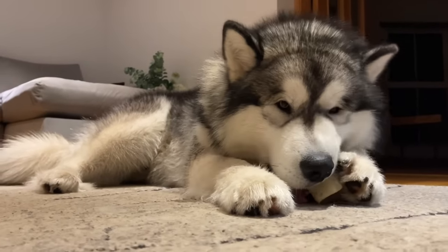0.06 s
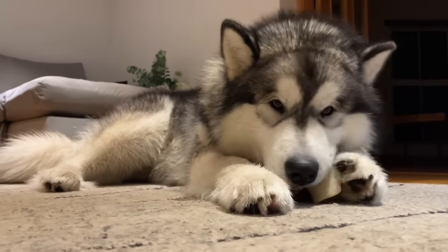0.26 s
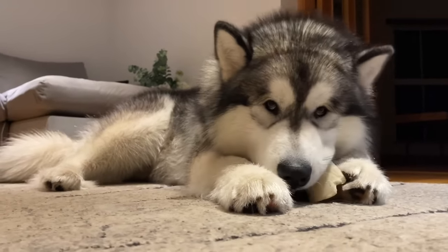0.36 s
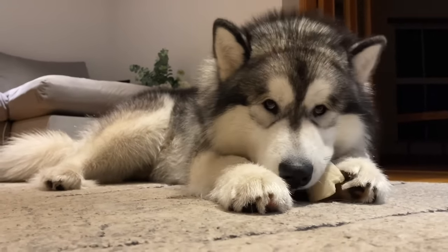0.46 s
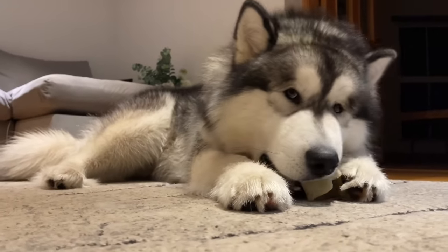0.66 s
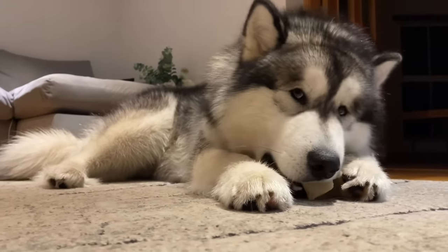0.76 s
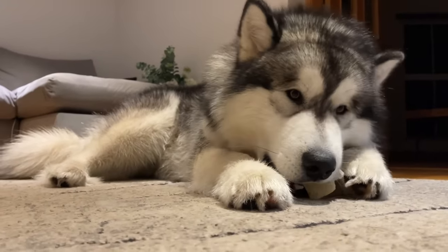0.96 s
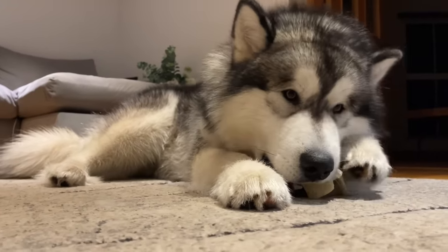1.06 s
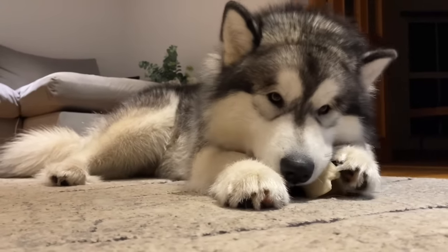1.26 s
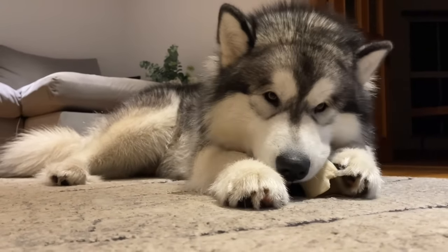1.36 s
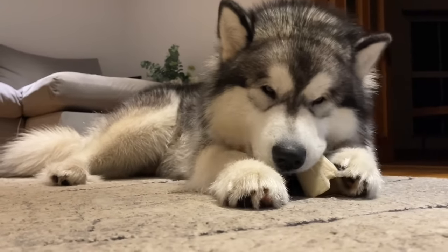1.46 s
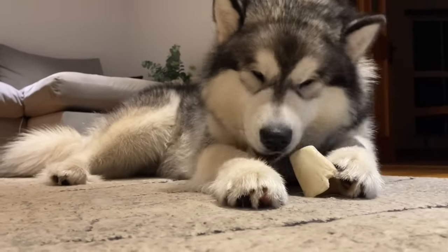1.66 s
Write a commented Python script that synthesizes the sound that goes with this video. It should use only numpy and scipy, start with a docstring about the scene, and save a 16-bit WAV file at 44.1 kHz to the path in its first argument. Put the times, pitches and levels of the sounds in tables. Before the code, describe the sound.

Close stereo pickup of dog teeth catching on a hard chew bone in a quiet living room; a sudden loud crack, a pause with small knocks, a second rougher crunching cluster, then faint ticks and quiet air.

```python
"""A soft hiss over a low murmur of air comes first; then a big dog gnaws a hard bone, close by, on a rug indoors.
Teeth catch in quick clusters: each catch is a short damped knock, noise bursts for splinters and crack, a low thud.
Gritty scrapes are rough filtered noise; small wet ticks between the bites are narrow noise bursts.
Echoes, a fading noise tail and slowly dying tones make the quiet living room ring on.
The murmur is steady filtered noise; the hiss is grainier, strongest just after the first loud bite, with a deep dip midway."""
import sys
import numpy as np
from scipy import signal
from scipy.fft import rfft, irfft
from scipy.io import wavfile
from scipy.ndimage import uniform_filter1d

SR = 44100
rng = np.random.default_rng(int(sys.argv[2]) if len(sys.argv) > 2 else 0)


def pcm_store(signal):
    """Save signal as 16-bit PCM."""
    levels = np.round(np.clip(np.atleast_2d(signal), -1, 1) * 32767)
    wavfile.write(sys.argv[1], SR, levels.astype(np.int16).T)


N = 74970  # length in samples, 1.7 s

# steady air in the room: [f/Hz, relative level/dB]
AIR_COLOUR = [(25, -7), (60, -22), (120, 0), (250, 0), (450, -3), (800, -4.5), (1200, -10.5), (2000, -48),
              (4000, -103), (12000, -53)]
AIR_DB = -66.5

# tone of the soft hiss: [f/Hz, relative level/dB]
HISS_COLOUR = [(300, 6), (1500, 10), (2300, 3), (3300, -1), (4600, 1.5), (6500, -4.5), (8400, 6),
               (9500, 1.5), (11300, 3), (12000, -35)]
# loudness of the hiss over time: [t/s, level/dB]
HISS_LEVEL = [(0, -61.5), (.11, -68.5), (.18, -64), (0.258, -55.5), (.39, -63.5), (.47, -60.5),
              (0.577, -66.5), (.72, -78), (0.818, -79.5), (.89, -62), (.98, -62.5), (1.089, -60.5),
              (1.16, -60.5), (1.31, -63.5), (1.382, -65), (1.429, -65.5), (1.499, -67), (1.7, -61.5)]
HISS_FLICKER_DB, HISS_GRAIN = 0.97, 0.31  # slow level changes; depth of the fast roughness

# tone of the room's fading tail: [f/Hz, relative level/dB]
ROOM_COLOUR = [(40, -8), (100, -14), (250, -8), (420, -9.5), (570, -20), (680, -9.5), (780, -25),
               (930, -15.5), (1200, -23.5), (1600, -21), (3000, -8.5), (8000, -8.5), (13000, -43)]
# time the tail takes to fall by 60 dB: [f/Hz, fall time/s]
ROOM_T60 = [(60, 0.85), (400, 0.88), (1000, 1), (3000, 0.37), (10000, 0.24)]
# standing waves of the room: [f/Hz, relative level/dB, time to fall by 60 dB/s]
ROOM_MODES = [(66, -27, 0.11), (173.3, -39, 0.42), (183, -42, 1.3), (269.6, -36, 0.24), (372, -42, 1.6),
              (420, -40.5, 0.96), (517, -44.5, 1), (657, -47, 1.1), (686, -46.5, 1.8), (908, -41, 0.96),
              (989, -42.5, 0.4)]
# share of the gnawing that carries into the room: [t/s, level/dB]
ROOM_SEND = [(.24, -2.5), (.68, -0.5), (.91, 0), (1.13, 1)]
EARLY_DB, EARLY_S, FIRST_ECHO_S = -13, 0.01, 0.004036
# delay counted from the first echo, spread, and strength of the far wall's answer
WALL_ECHO_S, WALL_ECHO_SPREAD_S, WALL_ECHO_DB = 0.1047, 0.0068, -1
MODE_WAVER, MODE_WAVER_HZ = 0.88, 21

# stereo noise: share of the part that is opposed between left and right
ROOM_WIDTH, AIR_WIDTH, HISS_WIDTH = 0.9, 0.46, 0.65
WIDE_ABOVE_HZ = 310

# soft bumps of bone and paws on the rug, and late low thuds just after some bites: [t/s, level/dB]
BUMPS = [(0.037, -84), (.688, -54), (.824, -70), (0.935, -58), (1.066, -71), (1.574, -59)]
FLOOR_LAG_S = 0.0022  # the floor answers after the jaw
THUD_HZ, THUD_S = 77.6, 0.0035  # floor: pitch, time to swell
JAW_HZ, JAW_S, JAW_DB = 255.3, 0.0023, 1  # jaw: pitch, time to swell, level against the floor

# small ticks of teeth and wet lips: [t/s, peak level/dB, centre f/Hz]
TICKS = [(0.0247, -51.5, 9300), (0.422, -44.5, 6440), (0.7092, -54, 9150), (0.788, -58, 8500),
         (.8992, -46.5, 8600), (1.058, -51, 8500), (1.2438, -50, 7900), (1.2703, -40.5, 8360),
         (1.3112, -45, 8000)]
TICK_S, TICK_WIDTH_OCT = 0.0012, 0.35  # fade time; octaves to each side of the centre

# teeth scraping over the bone, into and through a bite: [t of the height/s, half length/s, level/dB]
SCRAPES = [(0.2283, 0.0048, -40), (0.252, 0.012, -52), (0.898, 0.0032, -55.5), (1.101, 0.0032, -54.5),
           (1.125, 0.013, -33.5)]
SCRAPE_GRAIN = 1.41

# tooth catches: [t/s, knock level/dB, knock f/Hz, nominal ring time/ms,
#                 splinter level/dB, crack level/dB, thud level/dB]
CATCHES = [(0.0328, -57, 910, 2.5, -80, -82, -98), (0.114, -43.5, 950, 1.8, -50, -66, -75),
           (0.1182, -49.5, 743, 2.1, -56, -75, -65), (0.2286, -18.5, 833, 0.77, -42, -36, -64),
           (0.2332, -7.5, 745, 0.85, -26.5, -27.5, -37.5), (.2351, -19, 717, 0.91, -52, -65, -52.5),
           (0.2411, -21.5, 873, 2.6, -64, -59, -66), (0.2469, -14, 613, 0.76, -42, -45, -41),
           (0.251, -30, 760, 4.4, -38, -56, -35.5), (.2611, -34, 706, 3.4, -59, -52, -47),
           (.2692, -34.5, 686, 3.4, -64, -66, -67), (0.6802, -26, 942, 1.05, -77, -50.5, -55.5),
           (0.6841, -44.5, 950, 0.86, -79, -70, -56), (0.8135, -45, 372, 1.5, -55, -87, -57),
           (.9042, -26.5, 653, 1.92, -32.5, -58, -55), (0.9091, -26, 538, 0.9, -47, -59, -49.5),
           (0.9143, -27, 684, 1.25, -44, -58, -47.5), (0.9175, -31.5, 880, 1.6, -52, -61, -52),
           (1.1091, -28, 860, 3.2, -47, -56, -74), (1.1177, -16, 935, 2.92, -24, -32.5, -46),
           (1.1235, -20.5, 690, 1.5, -52, -48, -53), (1.1310, -12.5, 562, 0.79, -23.5, -34.5, -26.5),
           (1.1341, -15.5, 662, 0.91, -37, -36, -34.5), (1.1365, -16, 1106, 0.87, -34, -36, -34.5),
           (1.1402, -27, 419, 2.56, -55, -55, -35), (1.1478, -35, 734, 2.2, -59, -54, -37.5)]
# upper resonances of the bone, set off by every catch: [f/Hz, level against the knock/dB, time to swell/ms]
BONE_MODES = [(1154, -21.5, 3), (1636, -16.5, 2.2)]
# the small bone radiates little bass, and lips and cheeks muffle its treble: [f/Hz, level/dB]
MUFFLE = [(100, -18), (300, 2), (1100, -0.5), (1450, -10), (2000, -46), (4000, -52)]
# splintering of the bone's surface: [f/Hz, level/dB]
SPLINTER_COLOUR = [(400, -36), (1000, 12), (1600, 17), (1950, 6), (2450, -2), (3100, -6.5), (4200, -29),
                   (8000, -18)]
# crack of a tooth: [f/Hz, level/dB]
CRACK_COLOUR = [(800, -15), (2300, 9.5), (3600, -7.5), (5500, 1.5), (8500, 4), (12000, -1), (16000, -36)]
SPLINTER_S, CRACK_S = 0.0024, 0.0014  # fade times

# the two microphone ports, timing: [f/Hz, phase by which left leads/rad]
PORT_PHASE = [(100, 0), (1700, -.2), (3100, .9), (4100, .1), (5100, .7), (6200, -.1), (7500, .9), (8700, 0),
              (10200, -3), (11500, -6.2)]
# the two microphone ports, loudness: [f/Hz, left minus right level/dB]
PORT_BALANCE = [(60, -1.5), (350, 0.3), (700, -1.5), (1900, -3), (3000, 0.8), (6000, 0), (7400, 1),
                (8100, -5), (9200, 0)]
LOW_CUT_HZ, TOP_HZ = 57, 12200


def undb(db):
    """Turn decibels into a gain factor."""
    return 10 ** (np.asarray(db) / 20)


def on_hz(points, hz):
    """Read a curve of (Hz, value) points, with straight lines between them on a log-frequency axis."""
    p = np.array(points, float)
    return np.interp(np.log(np.maximum(hz, 1)), np.log(p[:, 0]), p[:, 1])


def colour(x, points):
    """Make each pitch louder or softer by a (Hz, dB) curve."""
    hz = np.arange(N + 1) * SR / (2 * N)
    spectrum = rfft(x, 2 * N)
    return irfft(spectrum * undb(on_hz(points, hz)))[..., :N]


def unit(x):
    """Scale to an average strength (rms) of 1."""
    return x / np.sqrt(np.mean(x ** 2))


def smooth_noise(size):
    """Noise averaged over a number of neighbouring samples, brought to rms 1."""
    return unit(uniform_filter1d(rng.standard_normal(N), size=size))


def wide_noise(width):
    """Stereo noise: a shared part plus an opposed part that weakens in the bass."""
    mid, side = rng.standard_normal((2, N))
    high_pass = signal.butter(1, WIDE_ABOVE_HZ, "high", fs=SR, output="sos")
    side = signal.sosfilt(high_pass, side)
    return np.array([mid + width * side, mid - width * side])


def since(start):
    """Seconds since a moment, zero before it."""
    return np.maximum(np.arange(N) / SR - start, 0)


def waver(rate_hz):
    """Slow random wandering around zero, made of straight lines between chance values."""
    return np.interp(np.arange(N) / SR * rate_hz, np.arange(256), rng.standard_normal(256))


def ring(age, hz, peak_s):
    """A heavily damped resonance: a tone that swells for peak_s and dies."""
    u = age / peak_s
    return u * np.exp(1 - u) * np.sin(2 * np.pi * hz * age)


def burst(age, decay_s):
    """A tiny fracture: noise that starts abruptly and dies at once."""
    return rng.standard_normal(N) * (age > 0) * np.exp(-age / decay_s) / 2


def air():
    """Low steady air in the room: noise with most of its treble removed."""
    return undb(AIR_DB) * unit(colour(wide_noise(AIR_WIDTH), AIR_COLOUR))


def hiss():
    """A soft, slightly grainy noise, loudest after the first loud bite, nearly gone midway, then back."""
    times, db = np.array(HISS_LEVEL).T
    flicker = unit(uniform_filter1d(smooth_noise(600), size=600))
    grain = np.exp(HISS_GRAIN * smooth_noise(40))
    level_db = np.interp(np.arange(N) / SR, times, db) + HISS_FLICKER_DB * flicker
    return undb(level_db) * unit(colour(wide_noise(HISS_WIDTH) * grain, HISS_COLOUR))


def early_echoes(age):
    """Dense early echoes off floor and furniture: noise that fades fast."""
    fading = wide_noise(ROOM_WIDTH) * np.exp(-age / EARLY_S)
    return undb(EARLY_DB) * fading / np.sqrt(SR * EARLY_S / 2)


def diffuse_tail(age):
    """Echoes blurred into noise: each pitch band fades at its own rate; the far wall adds a swell."""
    centres = 62.5 * 2. ** np.arange(9)  # one band per octave
    hz = np.arange(N // 2 + 1) * SR / N
    octave = np.log2(np.clip(hz, centres[0], centres[-1]))
    noise, tail = rfft(wide_noise(ROOM_WIDTH)), 0
    for centre in centres:
        weight = np.maximum(1 - np.abs(octave - np.log2(centre)), 0)  # neighbouring bands overlap
        band = irfft(noise * weight, N)
        # a factor of 1000 is a fall of 60 dB
        tail = tail + band * np.exp(-np.log(1000) * age / on_hz(ROOM_T60, centre))
    wall_bump = np.exp(-((age - WALL_ECHO_S) / WALL_ECHO_SPREAD_S) ** 2)
    far_wall = 1 + undb(WALL_ECHO_DB) * wall_bump
    return colour(tail, ROOM_COLOUR) * far_wall / np.sqrt(SR / 20)


def standing_waves(age):
    """Waves caught between the walls: slowly dying tones, wavering as close neighbours beat."""
    standing = 0
    for hz, db, t60 in ROOM_MODES:
        # the complex waver moves both the strength and the phase
        beating = 1 + MODE_WAVER * (waver(MODE_WAVER_HZ) + 1j * waver(MODE_WAVER_HZ))
        tone = np.exp((2j * np.pi * hz - np.log(1000) / t60) * age)
        standing = standing + undb(db) * np.imag(beating * tone) / np.sqrt(SR / 20)
    return standing


def room(x):
    """The room answers every instant of a sound with its echoes, tail and standing waves (convolution)."""
    age = since(FIRST_ECHO_S)
    response = diffuse_tail(age) + early_echoes(age) + standing_waves(age)
    response = response * (age > 0)  # silent until the first echo
    return signal.fftconvolve(x[None], response, axes=1)[:, :N]


def thud(age):
    """A low thud through the jaw, then through the floor: two damped tones."""
    floor = ring(np.maximum(age - FLOOR_LAG_S, 0), THUD_HZ, THUD_S)
    jaw = undb(JAW_DB) * ring(age, JAW_HZ, JAW_S)
    return floor + jaw


def bumps():
    """Bone and paws shift on the rug, and some bites are followed by a late low thud; each is a low thud."""
    return sum(undb(db) * thud(since(start)) for start, db in BUMPS)


def ticks():
    """Thin, bright ticks of teeth and wet lips: tiny noise bursts kept to a narrow band."""
    out = np.zeros(N)
    for start, db, hz in TICKS:
        edges = hz * 2. ** np.array([-TICK_WIDTH_OCT, TICK_WIDTH_OCT])
        edges = np.clip(edges, 20, SR / 2 - 100)
        band_pass = signal.butter(1, edges, "band", fs=SR, output="sos")
        tick = signal.sosfilt(band_pass, burst(since(start), TICK_S))
        out += undb(db) * tick / np.abs(tick).max()
    return out


def scrapes():
    """Gritty friction: rough noise that swells and fades as a tooth drags over the bone."""
    t = np.arange(N) / SR
    pressure = sum(undb(db) * np.exp(-((t - at) / half_s) ** 2) for at, half_s, db in SCRAPES)
    grit = unit(np.exp(SCRAPE_GRAIN * smooth_noise(30)))
    return colour(pressure * grit * rng.standard_normal(N), SPLINTER_COLOUR)


def knock(age, hz, ring_s):
    """A hollow knock muffled by lips: a damped tone with a rounded onset, soon gone."""
    u = age / (1.03 * ring_s)
    return (u * np.exp(1 - u)) ** 2 * np.sin(2 * np.pi * hz * age)


def bone_ring(age):
    """The bone's own upper resonances, set off by a catch."""
    return sum(undb(db) * ring(age, hz, ms / 1000) for hz, db, ms in BONE_MODES)


def bites():
    """Each catch knocks the bone in the mouth, splinters it, cracks at the tooth and thuds below."""
    body, splinters, cracks, thuds = np.zeros((4, N))
    for start, db, hz, ring_ms, splinter_db, crack_db, thud_db in CATCHES:
        age = since(start)
        body += undb(db) * (knock(age, hz, ring_ms / 1000) + bone_ring(age))
        splinters += undb(splinter_db) * burst(age, SPLINTER_S)
        cracks += undb(crack_db) * burst(age, CRACK_S)
        thuds += undb(thud_db) * thud(age)
    return colour(body, MUFFLE) + colour(splinters, SPLINTER_COLOUR) + colour(cracks, CRACK_COLOUR) + thuds


def scene():
    """The background, the gnawing dog and the room that answers it."""
    dog = bumps() + ticks() + scrapes() + bites()
    send = undb(np.interp(np.arange(N) / SR, *np.array(ROOM_SEND).T))
    return air() + hiss() + room(dog * send) + dog


def record(dry):
    """Two ports differ a little in level and phase; the deepest bass and the top are cut."""
    hz = np.arange(N + 1) * SR / (2 * N)
    half = np.array([[.5], [-.5]])  # each side takes half of the difference
    port_gain = undb(half * on_hz(PORT_BALANCE, hz))
    port_turn = np.exp(1j * half * on_hz(PORT_PHASE, hz))
    heard = irfft(rfft(dry, 2 * N) * port_gain * port_turn)[:, :N]
    low_cut = signal.butter(4, LOW_CUT_HZ, "high", fs=SR, output="sos")
    top_cut = signal.ellip(8, .2, 70, TOP_HZ, fs=SR, output="sos")  # very steep
    return signal.sosfilt(top_cut, signal.sosfilt(low_cut, heard))


dry = scene()
out = record(dry)
pcm_store(out)
```